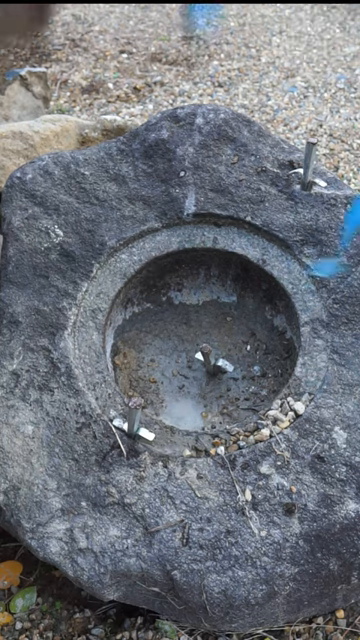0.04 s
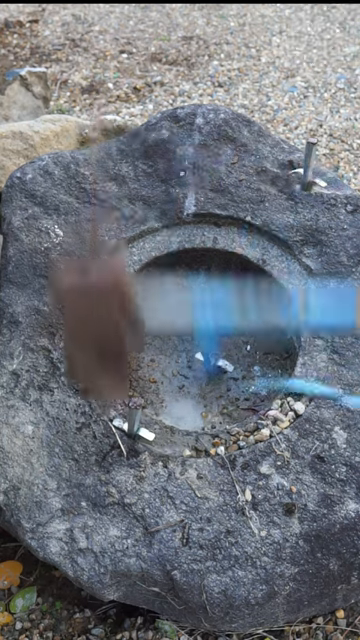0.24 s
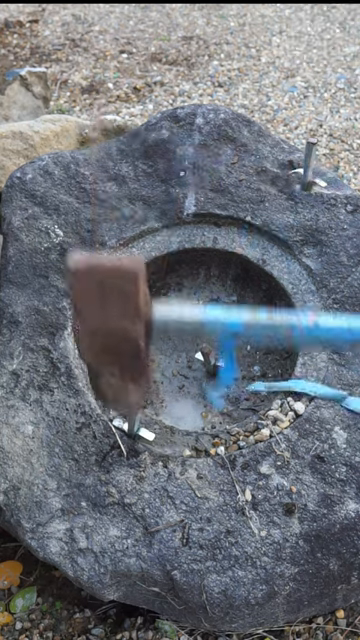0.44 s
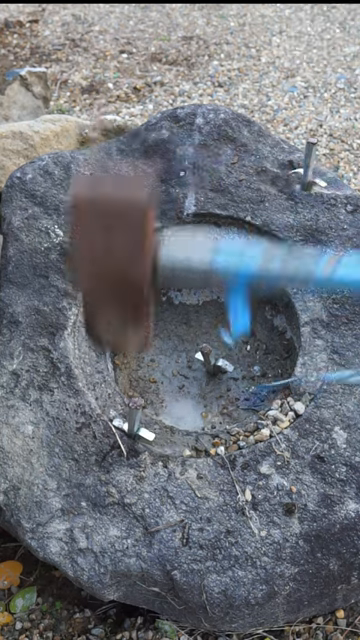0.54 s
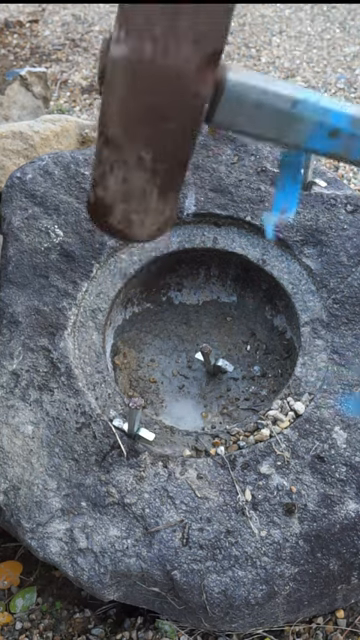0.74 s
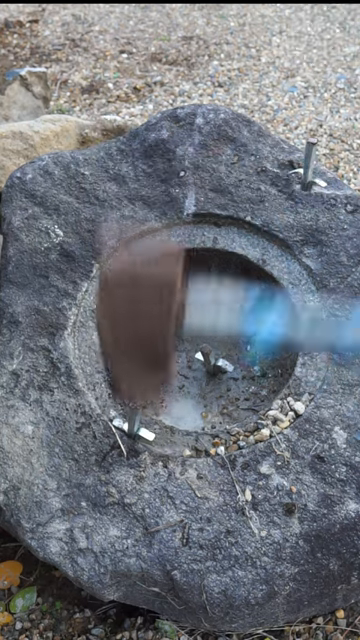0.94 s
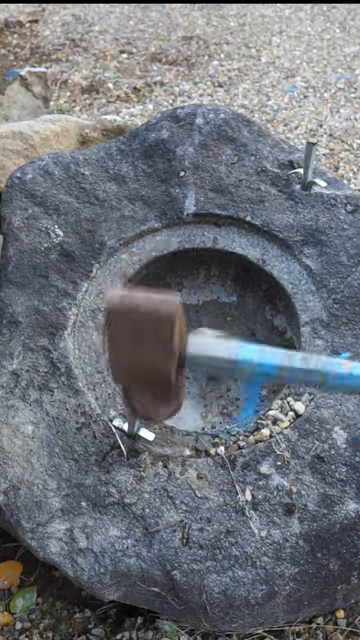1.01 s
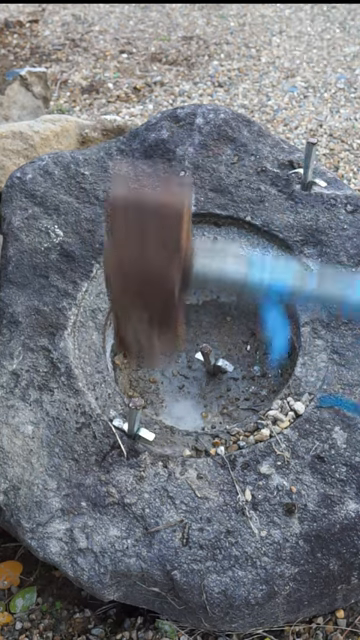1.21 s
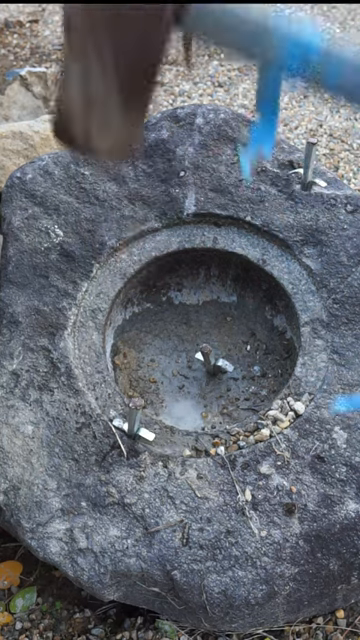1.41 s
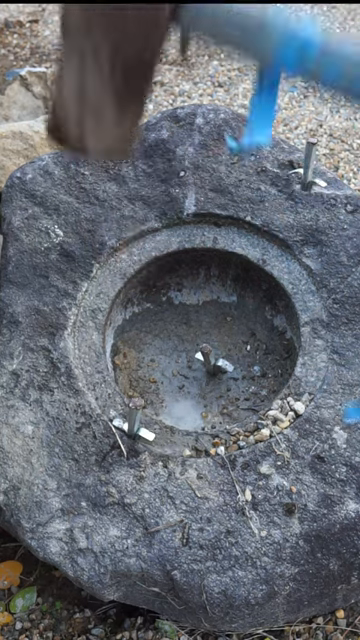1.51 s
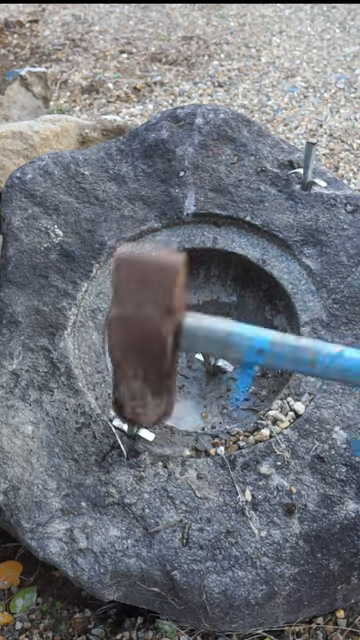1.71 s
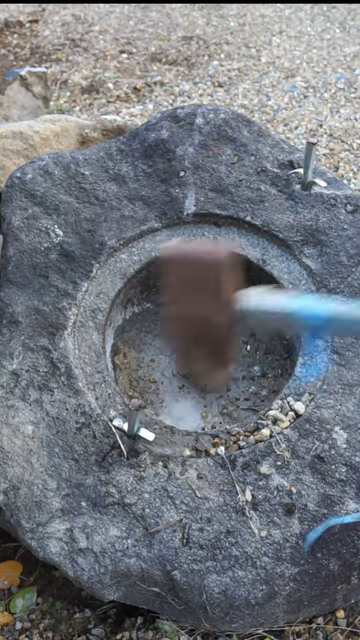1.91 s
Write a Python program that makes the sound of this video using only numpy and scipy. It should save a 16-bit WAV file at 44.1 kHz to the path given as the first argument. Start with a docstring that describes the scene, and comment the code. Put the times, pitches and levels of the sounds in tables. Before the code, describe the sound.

Three evenly spaced sledgehammer strikes land on metal wedges set in stone, close by in quiet outdoor air. Each cracks and rings briefly, leaving a short echo, with faint gritty crackles and small metal clinks in between.

```python
"""Faint outdoor air, dry taps and grit, then a sledgehammer drives three steel wedges into a boulder.
One blow per wedge: a noise crack, a dull thud from the stone's modes, a bright ping from the wedge's.
Low tones sing on after each blow and the surroundings answer with a long wash of echoes.
Between blows loose steel clinks and grit crackles; two soft noises come and go underneath."""
import sys
import numpy as np
from scipy import signal
from scipy.fft import rfft, irfft
from scipy.io import wavfile

SR = 44100
rng = np.random.default_rng(int(sys.argv[2]) if len(sys.argv) > 2 else 0)


def unload_audio(sound):
    """Save the sound as a 16-bit wav file, at the path given as the first command line argument."""
    columns = np.transpose(np.atleast_2d(sound))
    # keep every value between -1 and 1, then stretch to whole-number steps
    steps = np.round(np.clip(columns, -1, 1) * 32767)
    wavfile.write(sys.argv[1], SR, steps.astype(np.int16))


N = 85995
T = np.arange(N) / SR
HZ = np.maximum(np.arange(N // 2 + 1) * SR / N, 1)
OCTAVES_ABOVE_1KHZ = np.maximum(np.log2(HZ / 1000), 0)
THUD_RISE_S, RING_RISE_S = 0.0027, 0.00048
LOW_CUT_HZ, GRIT_PAN_DB = 320, -4

# Stereo image of air, grinding and echoes. Each row: frequency in Hz, left-right correlation.
DIFFUSE_CORRELATION = [(60, .93), (300, .96), (650, 0.59), (1400, 0.57), (3100, 0.11), (7000, .05),
                       (15000, .1)]
# Stereo image of cracks and grit. Each row: frequency in Hz, left-right correlation.
CRACK_CORRELATION = [(100, 0.85), (1000, 0.69), (4000, 0.41), (12000, 0.1)]


def from_db(db):
    """Decibels to gain."""
    return 10 ** (np.asarray(db) / 20)


def at_hz(points):
    """Rows of (Hz, value) interpolated onto HZ, log frequency axis."""
    hz, values = np.transpose(points)
    return np.interp(np.log(HZ), np.log(hz), values)


def fade(t60_s):
    """Exponential decay, 60 dB in t60_s."""
    return np.exp(-np.log(1000) * T / t60_s)


def mode(hz, db, t60_s, rise_s):
    """Damped sine with a quick rise."""
    return from_db(db) * np.sin(2 * np.pi * hz * T) * fade(t60_s) * (1 - np.exp(-T / rise_s))


def place(x, start_s, pan_db=0):
    """Delay and pan; pan_db is left minus right."""
    out, start = np.zeros((2, N)), max(int(start_s * SR), 0)
    out[:, start:] = x[..., :N - start]
    return out * from_db([[pan_db / 2], [-pan_db / 2]])


def noise(colour_db, correlation):
    """Stereo noise, rms 1, with given spectrum and left-right correlation."""
    mid, side = rfft(rng.standard_normal((2, N)))
    alike = np.clip(at_hz(correlation), -1, 1)
    gain = from_db(colour_db + np.zeros_like(HZ))
    stereo = np.sqrt((1 + alike) / 2) * mid + np.sqrt((1 - alike) / 2) * side * [[1], [-1]]
    return irfft(stereo * gain / np.sqrt(np.mean(gain ** 2)), N)


def low_cut(x, hz):
    """Second-order high-pass."""
    return signal.sosfilt(signal.butter(2, hz, "high", fs=SR, output="sos"), x + 1e-18)


def background():
    """Steady outdoor air, a soft rush at the start and a hollow swell after the later blows."""
    # Spectra. Each row: frequency in Hz, relative level in dB.
    air_colour = [(18, -53.5), (30, -31), (889, -5), (1190, -20.5), (2480, -9.5), (2680, 4.5), (2900, -27),
                  (3490, -7), (3980, -4.5), (8740, -7.5), (16000, -8)]
    rush_colour = [(35, -74), (60, -44), (153, -39.5), (371, -17), (666, -16.5), (842, 0.5), (1060, -4.5),
                   (1740, -8), (2520, -4), (7570, -20.5), (11800, -22.5), (16000, -30)]
    swell_colour = [(59, -76), (100, -42.5), (365, -12), (570, -20), (662, -2.5), (736, -8), (910, -1),
                    (1450, -19), (2170, -8), (2750, -13), (3120, -14), (6150, -22.5), (7940, -28.5),
                    (9610, -33.5), (16000, -33)]
    # Envelopes. Each row: time in seconds, level in dB.
    rush_level = [(0, -50.5), (0.08, -51.5), (0.17, -47.5), (0.24, -56), (0.4, -63.5), (0.6, -81)]
    swell_level = [(0.9, -76.5), (1.05, -60), (1.22, -55), (1.4, -65.5), (1.58, -79), (1.8, -60.5),
                   (1.95, -61)]
    soft = 0
    for level, colour in ((rush_level, rush_colour), (swell_level, swell_colour)):
        envelope = from_db(np.interp(T, *np.transpose(level)))
        soft = soft + envelope * noise(at_hz(colour), DIFFUSE_CORRELATION)
    air = from_db(-69) * noise(at_hz(air_colour), DIFFUSE_CORRELATION)
    return place(air + soft, 0, pan_db=0.5)


def taps():
    """Small dry knocks, a few damped modes each."""
    # Each row: start in seconds, level in dB, pitch in Hz, t60 in seconds.
    hits = [(0.002, -35, 1100, 0.077), (0.125, -33.5, 1400, 0.029), (0.208, -24, 1314, 0.011),
            (1.717, -40, 2020, 0.034), (1.828, -42.5, 1093, 0.043)]
    # Each row: ratio to the pitch, relative level in dB.
    partials = [(0.798, -12), (1, -2), (1.449, -10), (2.05, -17.5)]
    out = 0
    for start_s, level_db, hz, t60_s in hits:
        tap = sum(mode(hz * ratio, level_db + db, t60_s, RING_RISE_S) for ratio, db in partials)
        out = out + place(tap, start_s, GRIT_PAN_DB)
    return out


def grit():
    """Grit crunches and skitters: short dying bursts of uneven grains."""
    # Each row: start in seconds, level in dB, t60 in seconds, tilt in dB per octave above 1 kHz.
    bursts = [(0.003, -37, 0.0027, -2.5), (0.008, -39.5, 0.041, -4), (0.208, -36, 0.009, -5),
              (0.2405, -23, 0.0029, 2), (0.24, -28, 0.033, -1.5), (0.249, -32.5, 0.049, -1),
              (0.262, -26, 0.0034, 8), (0.297, -41, 0.035, -3), (0.311, -47, 0.12, 12),
              (0.546, -56, 0.022, -3), (0.568, -62, 0.014, -4), (0.587, -54.5, 0.036, -1),
              (0.615, -47.5, 0.009, 0.5), (0.631, -56, 0.022, -1), (0.643, -44.5, 0.0085, 6),
              (0.66, -55.5, 0.0068, 15), (0.709, -61, .015, 12), (0.747, -47, 0.09, 16),
              (0.763, -60, .025, -2), (0.793, -39.5, 0.0057, 3), (0.799, -41, 0.054, 24),
              (0.808, -47, 0.037, 13), (0.926, -54, 0.028, 2.5), (0.964, -46, 0.021, -5),
              (1.013, -46.5, 0.016, -5), (1.325, -57, .05, 16), (1.34, -52.5, 0.029, 9.5),
              (1.450, -50.5, 0.024, 3), (1.567, -45, 0.0088, 12.5), (1.621, -45.5, 0.018, 10),
              (1.625, -52, 0.067, -2), (1.717, -41.5, 0.044, -4.5), (1.798, -67, .02, -23),
              (1.826, -42.5, 0.025, 0), (1.861, -46.5, 0.023, -4.5), (1.879, -49, 0.018, -1)]
    # Each row: frequency in Hz, relative level in dB.
    colour = [(100, -22.5), (1000, -2.5), (3000, 4.5), (8000, 6.5), (12000, 3.5), (16000, -9)]
    spread_db, knots_s = 2.5, T[::32]
    out = 0
    for start_s, db, t60_s, tilt_db in bursts:
        sizes = from_db(spread_db * np.interp(T, knots_s, rng.standard_normal(len(knots_s))))
        hiss = noise(at_hz(colour) + tilt_db * OCTAVES_ABOVE_1KHZ, CRACK_CORRELATION)
        grains = hiss * sizes / np.sqrt(np.mean(sizes ** 2))
        out = out + place(from_db(db) * fade(t60_s) * grains, start_s, GRIT_PAN_DB)
    return out


def stone_thud(hz, level_db, t60_s):
    """The boulder's low, heavily damped modes."""
    # Each row: ratio to the pitch, relative level in dB.
    partials = [(.76, -18), (1, -1), (1.151, -7)]
    return sum(mode(hz * ratio, level_db + db, t60_s, THUD_RISE_S) for ratio, db in partials)


def wedge_ping(wedge, grind, lag_s):
    """A wedge rings, later on the right by lag_s, and grinds in its hole as a band of noise."""
    ring = sum((-1) ** k * mode(hz, db, t60_s, RING_RISE_S) for k, (hz, db, t60_s) in enumerate(wedge))
    right = irfft(rfft(ring) * np.exp(-2j * np.pi * HZ * lag_s), N)
    centre_hz, half_width_hz, grind_db = grind
    band = noise(-10 * np.log10(1 + ((HZ - centre_hz) / half_width_hz) ** 4), DIFFUSE_CORRELATION)
    grinding = from_db(grind_db) * band * fade(t60_s=0.033) * (1 - np.exp(-T / RING_RISE_S))
    return np.array([ring, right]) + grinding


def impact_crack(db, tilt_db):
    """The hammer's impact: a brief broadband burst."""
    # Each row: frequency in Hz, relative level in dB.
    colour = [(40, -20), (120, -24.5), (300, -8.5), (900, 6.5), (1500, -3), (2500, 1.5), (5000, 7),
              (9500, 4.5), (13000, 9), (16000, 2)]
    burst = noise(at_hz(colour) + tilt_db * OCTAVES_ABOVE_1KHZ, CRACK_CORRELATION)
    return from_db(db) * fade(t60_s=0.02) * burst


def blows():
    """Thud, ping, crack and a weaker rebound ping per blow; returns direct sound and echo send."""
    # Each row: start in seconds; thud level in dB, pitch in Hz, t60 in seconds; crack level in dB,
    # tilt in dB per octave above 1 kHz; ping pan in dB, right lag in seconds; echo sends of thud,
    # crack and ping in dB; rebound delay in seconds, level relative to the ping in dB.
    strikes = [(0.2669, -17.5, 420.6, 0.033, -19, -2.5, -1, 0.000027, 1.5, -7.5, -3, 0.074, -26),
               (0.9792, -19.5, 392.7, 0.034, -27, -0.5, -9, 0.000023, 0.5, -1.5, 3.5, 0.029, -15),
               (1.6905, -14, 360, 0.021, -23, -3.5, -4.5, 0.0000073, -2, 4.5, -2, 0.014, -36)]
    # One list of modes per wedge. Each row: frequency in Hz, level in dB, t60 in seconds.
    wedges = [
        [(884, -27.5, 0.023), (2674, -21.5, 0.02), (4560, -20.5, .012), (5830, -5, 0.0063), (6160, -8.5, 0.011),
         (7065, -11, 0.025), (11900, -27, 0.0067)],
        [(703, -26.5, 0.0096), (1020, -34.5, 0.016), (2065, -22, 0.0049), (2520, -42, 0.034), (6200, -32, .016),
         (6880, -27.5, 0.025), (7850, -17.5, 0.033), (12850, -29.5, 0.011)],
        [(1060, -32.5, 0.029), (2440, -37, 0.049), (6020, -15, 0.0063), (7130, -20, 0.0056), (7810, -13, 0.01),
         (8600, -12, 0.004), (12600, -25, 0.0091)],
    ]
    # One grinding band per wedge. Each row: centre in Hz, half-width in Hz, level in dB.
    grinds = [(6500, 470, -14.5), (7380, 110, -22.5), (8350, 1100, -29.5)]
    direct, send = 0, 0
    for strike, wedge, grind in zip(strikes, wedges, grinds):
        (start_s, thud_db, thud_hz, thud_t60_s, crack_db, tilt_db, pan_db, lag_s,
         thud_send_db, crack_send_db, ping_send_db, rebound_s, rebound_db) = strike
        thud = stone_thud(thud_hz, thud_db, thud_t60_s)
        ground = mode(hz=101.5, db=-49, t60_s=0.016, rise_s=THUD_RISE_S)  # boulder pushes on the ground
        ping = wedge_ping(wedge, grind, lag_s)
        crack = impact_crack(crack_db, tilt_db)
        rebound = from_db(rebound_db) * place(ping, start_s + rebound_s, pan_db / 2)
        direct = direct + place(thud + ground, start_s) + place(crack, start_s, pan_db / 2)
        direct = direct + place(ping, start_s, pan_db) + rebound
        lows = ground + from_db(thud_send_db) * thud
        highs = from_db(crack_send_db) * crack + from_db(ping_send_db) * ping
        send = send + place(lows + highs, start_s, pan_db=-0.5)
    return low_cut(direct, LOW_CUT_HZ), low_cut(send, hz=90)


def after_tones():
    """Faint low partials swell after each blow, waver and die."""
    # Each row: start in seconds, frequency in Hz, level in dB, rise in seconds, t60 in seconds.
    tones = [(0.267, 642, -44.5, 0.011, 0.64), (0.267, 413, -67.5, .03, 0.98),
             (0.98, 418.4, -53.5, 0.045, 0.52), (1.03, 674, -50, 0.12, 0.55),
             (0.98, 996, -53, 0.0071, 0.45), (1.691, 704, -51.5, 0.069, 0.49),
             (1.691, 671, -55.5, 0.039, .55), (1.691, 1038, -54, 0.019, 0.47),
             (1.691, 328, -62, 0.09, 0.67), (1.691, 258, -53, 0.039, 0.43)]
    out, knots_s = 0, np.arange(400) * 0.0097
    for start_s, hz, db, rise_s, t60_s in tones:
        waver_db = np.interp(T, knots_s, rng.standard_normal(len(knots_s)))
        decay_db = 60 * (T / t60_s) ** 1.99  # holds, then falls ever faster
        envelope = from_db(db + waver_db - decay_db) * (1 - np.exp(-T / rise_s))
        out = out + place(envelope * np.sin(2 * np.pi * hz * T), start_s)
    return out


def echoes(send):
    """Scattered echoes from the surroundings build after a short gap and die band by band."""
    # Each row: band centre in Hz, gain in dB, t60 in seconds.
    bands = [(49.9, -8, .7), (105, -3.5, .65), (177, -15, 0.68), (302.6, -6.5, 0.65), (437, -11, 0.48),
             (660, -9, 0.93), (1000, -9, 0.44), (1500, -14, 0.95), (2320, -13.5, 1.0), (2700, -7.5, .9),
             (3330, -11, 0.67), (4500, -11.5, 0.68), (7480, -10, 0.46), (10000, -14, 0.46),
             (15000, -20.5, 0.51)]
    gap_s, build_s = 0.018, 0.014
    scatter, tail = rfft(noise(0, DIFFUSE_CORRELATION)), 0
    log_centres = np.log([row[0] for row in bands])
    for share, (_, db, t60_s) in zip(np.eye(len(bands)), bands):
        band = irfft(scatter * np.interp(np.log(HZ), log_centres, share), N)
        envelope = fade(t60_s) * (1 - np.exp(-T / build_s))
        tail = tail + from_db(db) * band * envelope / np.sqrt(np.sum(envelope ** 2))
    return signal.fftconvolve(send, place(tail, gap_s), axes=1)[:, :N]


def clinks():
    """Loose steel rings briefly, with a lower partial and a knock under the firmer touches."""
    # Each row: start in seconds, ring level in dB, pitch in Hz, low partial, knock and pan in dB.
    touches = [(0.46, -48.5, 2704, -105, -80, -7), (0.658, -49.5, 2704, -80.5, -74, -10),
               (0.710, -50.5, 2710, -87, -85, -16.5), (0.793, -52.5, 2750, -64.5, -85, -14.5),
               (0.926, -50, 2725, -64.5, -80, -14.5), (1.450, -42.5, 2373, -62.5, -53.5, -3),
               (1.483, -53.5, 2420, -78, -69, -2.5), (1.621, -40, 2310, -56.5, -56, 2),
               (1.628, -33, 2400, -44, -42, -3.5), (1.828, -42.5, 2380, -60, -44, -9)]
    # Each row: ratio to the pitch, relative level in dB, t60 in seconds.
    partials = [(1.001, -4, 0.038), (1.3, -20, 0.052), (1.9, -20, 0.021), (2.5, -26, 0.013)]
    out = 0
    for start_s, ring_db, hz, low_db, knock_db, pan_db in touches:
        ring = sum(mode(hz * ratio, ring_db + db, t60_s, RING_RISE_S) for ratio, db, t60_s in partials)
        low = mode(hz=1260, db=low_db, t60_s=0.069, rise_s=RING_RISE_S)
        knock = mode(hz=479, db=knock_db, t60_s=0.031, rise_s=THUD_RISE_S)
        out = out + place(ring + low + knock, start_s, pan_db)
    return out


def scene():
    """Blows and small sounds with their echoes, plus after-tones and background."""
    direct, send = blows()
    small = low_cut(taps() + clinks(), LOW_CUT_HZ) + low_cut(grit(), hz=300)
    return direct + after_tones() + small + echoes(send + from_db(-0.5) * small) + background()


def record(dry):
    """Soft clip, then a steep low-pass."""
    stop_db, stop_hz = 70, 16900
    return signal.sosfilt(signal.cheby2(16, stop_db, stop_hz, fs=SR, output="sos"), np.tanh(dry))


dry = scene()
out = record(dry)
unload_audio(out)
```